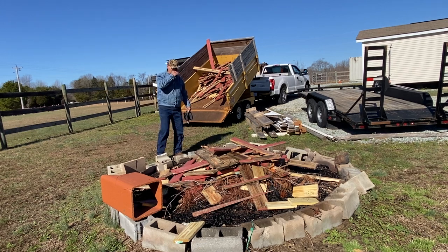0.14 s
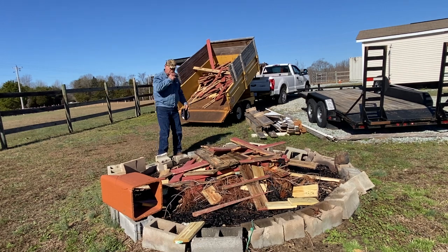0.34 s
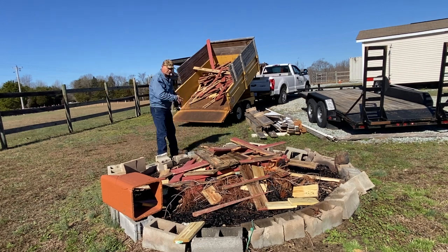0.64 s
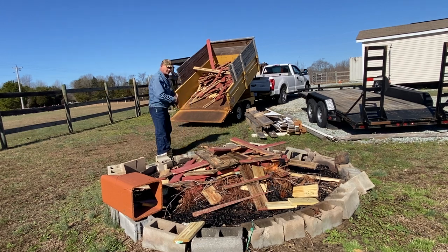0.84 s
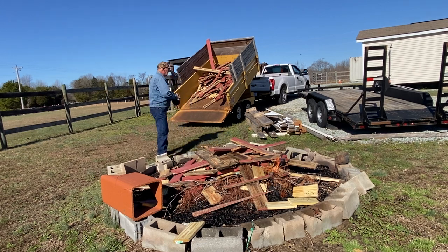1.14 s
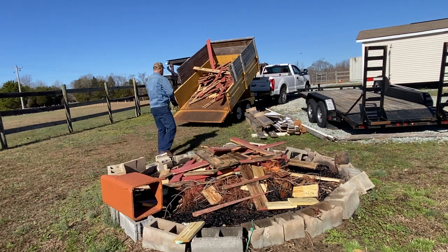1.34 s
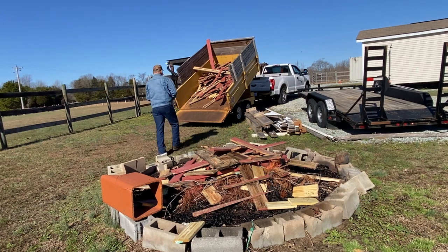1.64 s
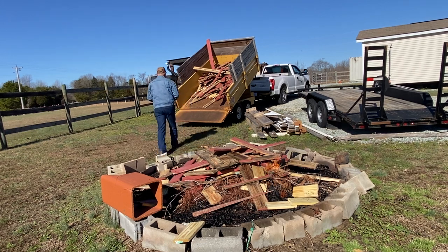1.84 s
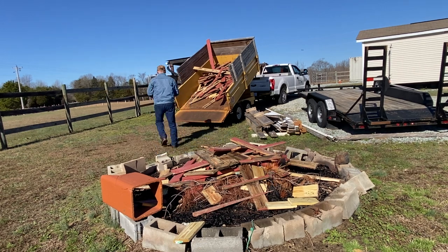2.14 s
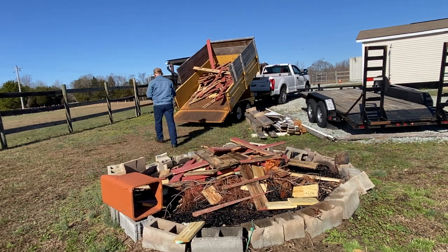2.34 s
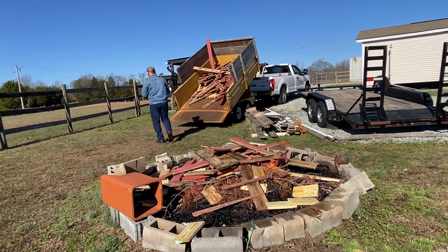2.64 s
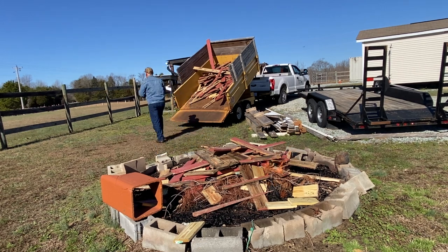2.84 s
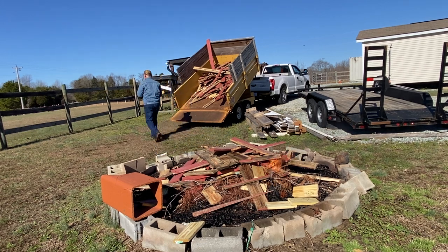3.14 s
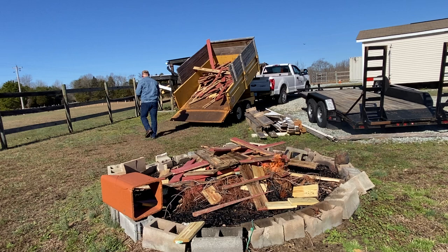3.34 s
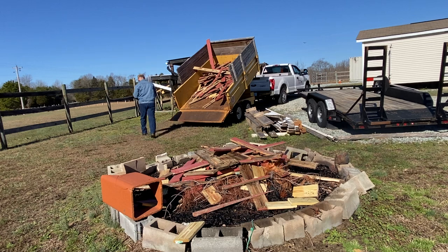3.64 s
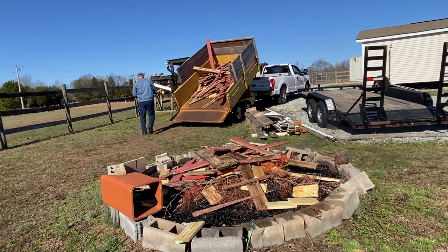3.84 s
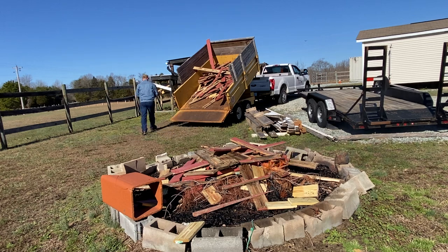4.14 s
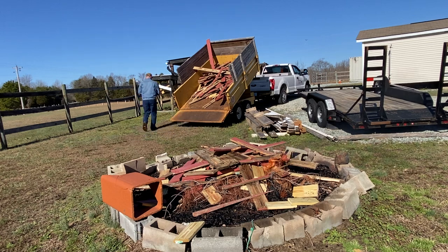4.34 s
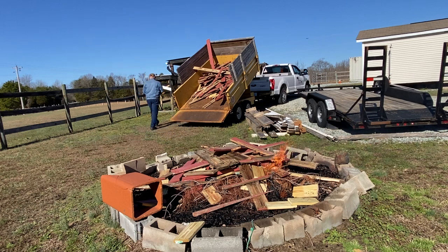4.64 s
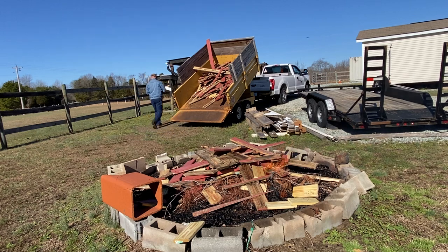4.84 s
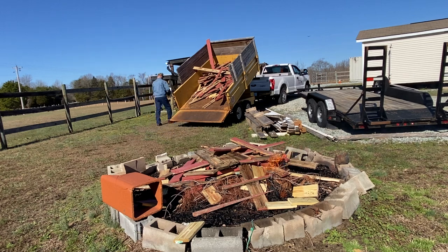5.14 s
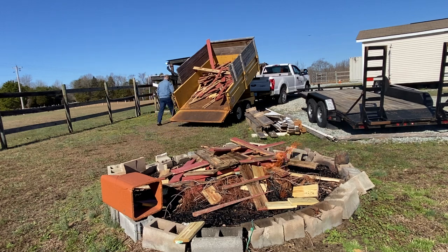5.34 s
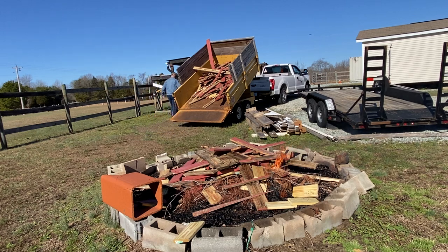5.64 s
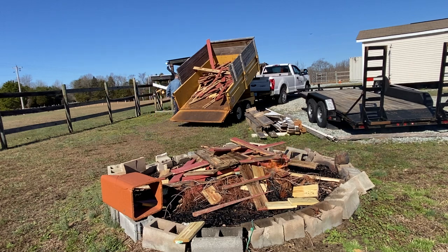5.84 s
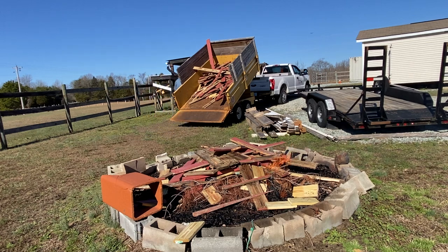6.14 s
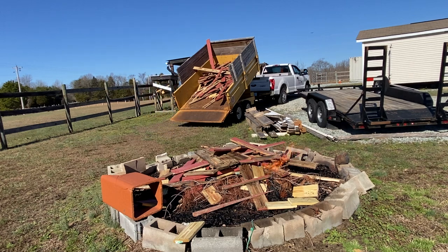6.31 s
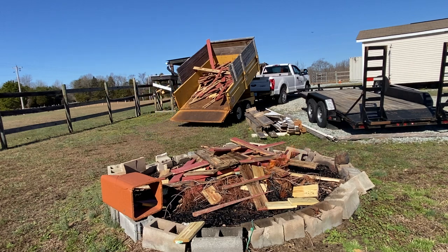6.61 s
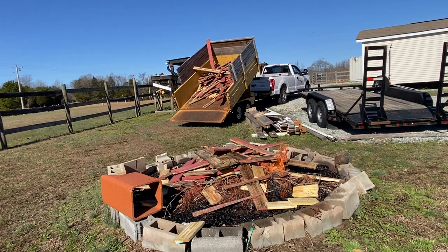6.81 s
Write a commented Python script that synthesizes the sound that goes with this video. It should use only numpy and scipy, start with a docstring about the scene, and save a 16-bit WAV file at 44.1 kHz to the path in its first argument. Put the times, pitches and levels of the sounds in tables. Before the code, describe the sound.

Sharp pops and spitting sap from a young wood fire outdoors, over buffeting breeze, a low distant idle and a hollow roar that swells and fades.

```python
"""Uneven wind rumble and a far rush, both shaped noise, are heard first.
Sharp pops and small ticks of burning scrap wood stand out, with spurts of sizzling sap:
cracks, wood rings and scattered noise make the snaps, shaped hiss the sizzle and the soft flames.
After one longer, duller swish, someone steps on dry grass; an engine, summed sine waves, idles further away.
A hollow roar of noise swells and dies away, and thin tones arch like bird calls."""
import sys
import numpy as np
from scipy import signal
from scipy.fft import rfft, irfft, next_fast_len
from scipy.io import wavfile

SR = 44100
rng = np.random.default_rng(int(sys.argv[2]) if len(sys.argv) > 2 else 0)


def transcribe(signal):
    """Save signal, clipped to [-1, 1], as a 16-bit WAV file at the path in sys.argv[1]."""
    frames = np.atleast_2d(signal).T
    limited = np.clip(frames, -1, 1)
    pcm = np.round(limited * 32767).astype(np.int16)
    wavfile.write(sys.argv[1], SR, pcm)


N = 307465
TIME = np.arange(N) / SR


def from_db(db):
    """Turns decibels into a factor of amplitude."""
    return 10 ** (np.asarray(db) / 20)


def rms_one(x):
    """Scales a signal to an average strength (rms) of 1."""
    return x / np.sqrt(np.mean(x ** 2) + 1e-20)


def in_time(rows):
    """Draws straight lines between the rows: one value per sample for each column after the time."""
    seconds, *columns = np.transpose(rows)
    return [np.interp(TIME, seconds, column) for column in columns]


def at_hz(points, hz):
    """Reads a curve over frequency, on a logarithmic frequency axis."""
    points = np.array(points)
    return np.interp(np.log(hz + 1e-9), np.log(points[:, 0]), points[:, 1])


def bin_hz(size):
    """Frequencies of the bins of a spectrum."""
    return np.arange(size // 2 + 1) * SR / size


def band(x, low_hz, high_hz, order=2):
    """Keeps the sound between two frequencies."""
    sos = signal.butter(order, [low_hz, min(high_hz, .45 * SR)], "band", fs=SR, output="sos")
    return signal.sosfilt(sos, x + 1e-18)


def drift(rate_hz):
    """Slow random wandering with spread 1: noise smoothed by two equal low-passes."""
    step = 40  # samples between two slow values
    r = np.exp(-2 * np.pi * step * rate_hz / SR)
    noise = rng.standard_normal(N // step + 2002)
    slow = signal.lfilter([1], [1, -2 * r, r * r], noise)[2000:]  # skips the filter's start
    return np.interp(np.arange(N) / step, np.arange(len(slow)), rms_one(slow))


def swells(rows):
    """Smooth bell-shaped rises and falls of amplitude, added in power."""
    power = 0
    for middle_s, length_s, db in rows:
        distance = np.abs(2 * (TIME - middle_s) / length_s)
        power = power + from_db(2 * db) * np.exp(-np.minimum(distance ** 2, 60))
    return np.sqrt(power)


def noise_pair(colour, alike, phase=None):
    """Coloured stereo noise of rms 1; the share "alike" of its power is common to both ports."""
    size = next_fast_len(N)
    hz = bin_hz(size)
    alike = np.clip(alike, 0, 1)
    shared, *own = rfft(rng.standard_normal((3, size)))
    pair = np.sqrt(alike) * shared + np.sqrt(1 - alike) * np.array(own)
    if phase is not None:
        pair[1] *= np.exp(-1j * at_hz(phase, hz))
    # fade out beyond both ends of the colour
    top_edge = 1 / (1 + (hz / (1.5 * colour[-1][0])) ** 6)
    bottom_edge = 1 / (1 + (colour[0][0] / (1.5 * hz + 1)) ** 4)
    shaped = pair * top_edge * bottom_edge * from_db(at_hz(colour, hz))
    return rms_one(irfft(shaped, size)[:, :N])


def place_in_stereo(x, lag_s, left_db):
    """Delays the left port (a negative lag makes it lead) and sets its level against the right one."""
    left, right = np.broadcast_to(x, (2, N))
    size = next_fast_len(N)
    delay = np.exp(-2j * np.pi * bin_hz(size) * lag_s)
    late = irfft(rfft(left, size) * delay, size)[:N]
    return np.array([late * from_db(left_db / 2), right * from_db(-left_db / 2)])


def patchy(x, low_hz, high_hz, patchy_db, count=14):
    """Each narrow band of a far sound swells and fades by itself in the moving air."""
    size = next_fast_len(N)
    spectrum = rfft(x, size)
    place = (count - 1) * at_hz([(low_hz, 0), (high_hz, 1)], bin_hz(size))
    out = 0
    for k in range(count):
        slice_gain = np.maximum(1 - np.abs(place - k), 0)  # overlapping triangles
        narrow = irfft(spectrum * slice_gain, size)[:, :N]
        out = out + from_db(patchy_db * drift(6.5)) * narrow
    return rms_one(out)


# thin, far tones like bird calls: (middle [s], length [s], top pitch [Hz], level [dB])
FAR_TONES = [(.21, .1, 1720, -80), (.3, .3, 1370, -78), (1.36, .36, 2720, -80)]


def far_tones(sag=.035, waver=0.0075):
    """Faint sine tones swell and fade; the pitch of each arches once and wavers a little."""
    out = 0
    for middle_s, length_s, top_hz, db in FAR_TONES:
        arch = sag * np.minimum((2 * (TIME - middle_s) / length_s) ** 2, 2)
        hz = top_hz * (1 - arch + waver * drift(16))
        tone = np.sqrt(2) * np.sin(2 * np.pi * np.cumsum(hz) / SR)
        out = out + tone * swells([(middle_s, length_s, db)])
    return place_in_stereo(out, lag_s=-.00015, left_db=0)


# how far the left port leads in far sounds, roar and rush: (frequency [Hz], lead [radians])
FAR_PHASE = [(250, 1.2), (500, 2.06), (900, 2.65), (1400, 3.81), (2200, 4.6), (4000, 4.35)]
# tone colour of the hollow roar: (frequency [Hz], relative level per Hz [dB])
ROAR_COLOUR = [(430, -15), (560, 1), (690, 0), (820, -10.5), (1100, -14.5)]
# the roar swells and dies away: (time [s], level [dB])
ROAR = [(3.7, -85), (4.05, -63), (4.45, -59.5), (4.7, -54.5), (4.95, -58), (5.55, -57.5), (6.15, -66),
        (6.5, -63.5), (6.97, -68)]
# its pitch dips and rises again: (time [s], pitch [ratio])
ROAR_PITCH = [(4.7, 1.04), (5.1, 0.99), (6.2, 1.06)]


def roar(waver_db=0.7):
    """A hollow roar of churning noise; reading it faster or slower bends its pitch."""
    level_db, = in_time(ROAR)
    ratio, = in_time(ROAR_PITCH)
    far_noise = noise_pair(ROAR_COLOUR, alike=0.96, phase=FAR_PHASE)
    churn = patchy(far_noise, 500, 850, patchy_db=2, count=6)
    read_at = np.cumsum(ratio) % N
    gliding = np.array([np.interp(read_at, np.arange(N), side) for side in churn])
    return from_db(level_db + waver_db * drift(6.0)) * gliding


# loudness of the engine: (time [s], level [dB])
ENGINE = [(0, -60.5), (1.1, -47.5), (2, -45), (2.5, -44.5), (3, -39.5), (4.3, -41.5), (5.3, -40.5),
          (6.2, -43), (6.5, -49.5), (6.97, -46)]
# idling speed of the engine: (time [s], speed [cycles per s])
IDLE = [(0, 11.45), (3.6, 11.55), (4.7, 11.45), (6.1, 11.2)]
# the exhaust note: (multiple of the cycle rate, relative level [dB])
ORDERS = [(5, 1), (8, -1), (11, -1.5), (13, 1), (14, -8.5), (16, -4.5), (19, -17.5)]


def engine(bass_growth=0.57, hunt=.004, waver_db=1.6):
    """Uneven firing favours a few multiples of the cycle rate; moving air makes each one waver."""
    level_db, = in_time(ENGINE)
    idle_hz, = in_time(IDLE)
    speed_hz = idle_hz * (1 + hunt * drift(2.01))
    turn = 2 * np.pi * np.cumsum(speed_hz) / SR
    # the deepest multiples fade first when the engine is faint
    bass_db = bass_growth * np.minimum(level_db - np.median(level_db), 0)
    note = 0
    for multiple, db in ORDERS:
        strength = from_db(db + (multiple < 10) * bass_db + waver_db * drift(2.2))
        note = note + strength * np.sin(round(multiple) * turn + rng.uniform(0, 2 * np.pi))
    return place_in_stereo(from_db(level_db) * rms_one(note), lag_s=-0.00032, left_db=-1.5)


# the breeze between gusts: (time [s], buffeting level [dB], low rumble level [dB])
WIND = [(0, -55.5, -48.5), (1.1, -50.5, -47), (1.8, -44.5, -48.5), (2.15, -46, -50), (2.55, -52, -45.5),
        (3.3, -49, -46.5), (4.2, -44, -45.5), (5.05, -46.5, -43), (5.6, -45.5, -48.5), (5.9, -47.5, -51.5),
        (6.25, -52, -55), (6.52, -51, -52), (6.97, -48, -56.5)]
# gusts that hit the ports: (middle [s], length [s], buffeting level [dB], low rumble level [dB])
GUSTS = [(0.19, 0.15, -46, -49), (2.173, 0.4, -55, -44), (2.932, 0.28, -46, -68), (4.053, 0.26, -41.5, -64),
         (5.435, 0.063, -38, -56), (5.678, 0.11, -41.5, -55), (6.15, 0.33, -40, -50),
         (6.74, 0.098, -36.5, -52), (6.887, 0.075, -47, -48.5)]
# far rush of the open land, which also guides the flames: (time [s], level [dB])
RUSH = [(0, -62), (.25, -59.5), (.6, -59.5), (.9, -59), (1.1, -60), (1.25, -55), (1.45, -58), (2.6, -59.5),
        (5.1, -60), (5.8, -59), (6.97, -61)]
# tone colours of buffeting, low rumble, small eddies and far rush:
# each (frequency [Hz], relative level per Hz [dB])
BUFFET_COLOUR = [(20, -23.5), (32, -13.5), (48, 1), (65, 5), (100, 4.5), (140, -7), (200, -33), (300, -45)]
RUMBLE_COLOUR = [(70, -19.5), (120, 0.5), (175, 2), (230, -8.5), (280, -17), (380, -39)]
EDDY_COLOUR = [(190, -1), (250, 0.5), (320, -10), (420, -15.5), (650, -44)]
RUSH_COLOUR = [(350, -13.5), (480, -2.5), (780, 3), (1050, 0), (1400, -8), (2000, -21.5), (3500, -31.5),
               (8000, -40.5)]


def wind(lumps_db=1.5, flutter_db=1.5, eddy_growth=0.55):
    """Gusts buffet the microphone ports over a low rumble and the rush of the open land."""
    breeze_db, rumble_db = in_time(WIND)
    rush_db, = in_time(RUSH)
    gust_force = swells([(s, length, buffet_db) for s, length, buffet_db, _ in GUSTS])
    gust_surge = swells([(s, length, low_db) for s, length, _, low_db in GUSTS])
    force = np.hypot(from_db(breeze_db), gust_force)
    surge = np.hypot(from_db(rumble_db), gust_surge)
    buffet = force * from_db(lumps_db * drift(5.8)) * noise_pair(BUFFET_COLOUR, alike=0.41)
    # small eddies grow faster than the rumble, so a stronger breeze is brighter
    eddy_db = -8.5 + eddy_growth * (rumble_db - np.mean(rumble_db))
    eddies = from_db(eddy_db) * noise_pair(EDDY_COLOUR, alike=0.8)
    churn = noise_pair(RUMBLE_COLOUR, alike=0.98) + eddies
    placed = place_in_stereo(churn, lag_s=-0.00035, left_db=-3.0)
    rumble = surge * from_db(flutter_db * drift(15.7)) * placed
    land = noise_pair(RUSH_COLOUR, alike=0.77, phase=FAR_PHASE)
    rush = from_db(rush_db) * patchy(land, 350, 1900, patchy_db=2)
    return buffet + rumble + rush


# footsteps in dry grass, after one longer, duller swish:
# (middle [s], length [s], level [dB], centre frequency [Hz])
SWISH_AND_STEPS = [(1.248, 0.23, -64, 1000), (1.922, 0.1, -68, 2000), (2.508, 0.091, -65, 2110),
                   (3.118, 0.073, -64, 1980), (3.618, 0.075, -69, 2000)]
# tone colour of the swish and of crushed grass: (frequency [Hz], relative level per Hz [dB])
GRASS_COLOUR = [(600, -3.5), (3000, -7), (8000, -7)]


def swish_and_footsteps(crunch_db=4.5):
    """A dull swish, then footsteps crushing dry grass: grainy noise, each in a band of its own."""
    crunch = rms_one(from_db(crunch_db * drift(130)))
    grass = crunch * place_in_stereo(noise_pair(GRASS_COLOUR, alike=.8), lag_s=-.0001, left_db=2)
    out = 0
    for middle_s, length_s, db, hz in SWISH_AND_STEPS:
        rustle = rms_one(band(grass, hz / 1.67, hz * 1.13, order=1))
        out = out + swells([(middle_s, length_s, db)]) * rustle
    return out


# tone colour of the flames: (frequency [Hz], relative level per Hz [dB])
FLAME_COLOUR = [(900, 5.5), (1500, -1.5), (2300, -0.5), (3100, -7.5), (5000, -11.5), (7000, -16),
                (9000, -23), (16000, -24)]
FLAME_DB = -75.5  # level at mean vigour and mean rush
FLAME_FOLLOWS, FLAME_FANNED = 0.47, 0.96  # shares of the swings in vigour and in the far rush


def flames(vigour_db, flutter_db=3.0):
    """The soft fluttering rustle of burning kindling grows with the fire, and the breeze fans it."""
    rush_db, = in_time(RUSH)
    grown_db = FLAME_FOLLOWS * (vigour_db - np.mean(vigour_db))
    fanned_db = FLAME_FANNED * (rush_db - np.mean(rush_db))
    rustle = place_in_stereo(noise_pair(FLAME_COLOUR, alike=.5), lag_s=0, left_db=3.5)
    return from_db(FLAME_DB + grown_db + fanned_db + flutter_db * drift(29)) * rustle


# jets of steam from boiling sap: (middle [s], length [s], level [dB])
SPURTS = [(.97, 0.3, -78), (1.785, 0.093, -66.5), (2.371, 0.047, -64), (2.55, .3, -75),
          (2.952, 0.041, -67.5), (3.25, 0.037, -60.5), (3.57, 0.085, -62.5), (4.105, 0.084, -60.5),
          (4.34, 0.041, -70.5), (5.23, 0.039, -72)]
# tone colour of the steam: (frequency [Hz], relative level per Hz [dB])
SIZZLE_COLOUR = [(2500, -13.5), (5000, -8.5), (8300, -11.5), (10500, -8), (13000, -0.5), (16000, -0.5)]
# the fire lies to the right, so the left port hears its hiss and cracks later
PORT_LAG_S = .000266


def sizzle(vigour_db, grain_db=2.0, unsteady_db=4.0):
    """Steam spits from the wood as a bright, grainy hiss that comes in spurts."""
    steady = from_db(vigour_db + unsteady_db * drift(28))
    flow = np.hypot(steady, swells(SPURTS))
    spit = rms_one(from_db(grain_db * drift(100)))
    hiss = place_in_stereo(noise_pair(SIZZLE_COLOUR, alike=.98), PORT_LAG_S, left_db=0)
    return flow * spit * hiss


def fractures(count, tear_s=.00016, fibres=0.29, size=256):
    """Each fracture is a step of pressure plus a split second of tearing fibres."""
    fade = np.exp(-np.arange(size) / (tear_s * SR))
    bursts = fibres * rng.standard_normal((count, size)) * fade
    bursts[:, 0] += 2
    return band(bursts, 9500, 16000)


# what a splitting board rings with:
# (multiple of the ring pitch, relative level [dB], time to fade by 60 dB [cycles])
WOOD_MODES = [(.3, -4.5, 3.3), (.64, 0.5, 5.2), (1.05, 2.5, 8.8), (1.35, -13, 9.2)]


def wood_rings(ring_hz, uneven_db=2, size=256):
    """Each board rings for a few cycles at its own pitch, with its own mix of modes."""
    turns = np.outer(ring_hz, np.arange(size) / SR)
    out = 0
    for k, (multiple, db, cycles) in enumerate(WOOD_MODES):
        strength_db = db + uneven_db * rng.standard_normal((len(ring_hz), 1))
        fading = from_db(strength_db - 60 * multiple * turns / cycles)
        out = out + (-1) ** k * fading * np.cos(2 * np.pi * multiple * turns)
    return band(out, 850, 7500)


def snaps(times, levels_db, bursts):
    """Sets each burst at its moment, with its level counted over 2 ms."""
    size = bursts.shape[1]
    energy = np.sum(bursts ** 2, axis=1, keepdims=True)
    bursts = bursts * np.sqrt(.002 * SR / energy)
    out = np.zeros(N + size)
    for s, db, burst in zip(times, levels_db, bursts):
        at = int(np.clip(s * SR, 0, N - 1))
        out[at:at + size] += from_db(db) * burst
    return out[:N]


def scatter(x, wet_db, t60_s, low_hz, high_hz):
    """Countless small reflections: each snap's energy dies away as noise, different at each port."""
    keep = from_db(-120 / (t60_s * SR))  # energy kept per sample: 60 dB down after t60_s
    energy = signal.lfilter([0, 1 - keep], [1, -keep], x ** 2 + 1e-18)
    noise = rms_one(band(rng.standard_normal((2, N)), low_hz, high_hz))
    return from_db(wet_db) * np.sqrt(energy) * noise


# pops and snaps of the wood, levels over the first 2 ms:
# (time [s], bright crack level [dB], woody body level [dB], ring pitch [Hz])
POPS = [(0.3251, -61.5, -65, 5600), (0.3427, -69, -64, 6700), (0.3799, -59.5, -69, 5700),
        (0.5199, -57, -59.5, 4500), (0.6951, -44, -48.5, 5640), (0.7033, -62, -59, 4800),
        (1.1153, -46.5, -53.5, 4300), (1.2376, -59, -64, 5300), (1.3475, -54, -58, 4900),
        (1.5176, -62.5, -64.5, 3560), (1.5439, -63, -66, 5200), (1.583, -64, -69, 5100),
        (1.6594, -57, -59, 4500), (1.9386, -40, -49, 5670), (2.0301, -65, -64, 5400),
        (2.0555, -53.5, -53.5, 5950), (2.1338, -63, -77, 5500), (2.4034, -55, -54, 5200),
        (2.6697, -58, -62.5, 3700), (2.7786, -63, -73, 5300), (2.813, -52, -55.5, 5740),
        (2.9988, -64, -59.5, 4520), (3.0346, -56.5, -55, 4640), (3.0619, -46, -43.5, 4900),
        (3.1492, -53, -51.5, 3440), (3.2273, -48.5, -51.5, 5330), (3.2771, -56, -54.5, 4430),
        (3.34, -56, -57.5, 6050), (3.4113, -63, -54.5, 5030), (3.4284, -65, -60, 5230),
        (3.4632, -63, -49, 4400), (3.4699, -50.5, -54, 5230), (3.4742, -52, -53, 4050),
        (3.5814, -54.5, -63, 5900), (3.6145, -54.5, -58, 4900), (3.622, -62, -58, 3540),
        (4.0079, -50, -46.5, 4550), (4.0281, -62.5, -62, 5900), (4.0466, -60, -55.5, 5343),
        (4.293, -62, -63, 4400), (4.7125, -62, -72, 4700), (4.7592, -52.5, -53.5, 4800),
        (4.866, -53.5, -66, 6530), (4.9184, -60.5, -62, 5600), (4.992, -63, -57, 3450),
        (5.017, -61, -62.5, 4800), (5.0959, -65, -63, 4800), (5.1853, -66, -60, 2580),
        (5.2816, -39.5, -43.5, 5800), (5.3434, -57, -65.5, 6000), (5.5301, -64, -68, 5790),
        (5.8041, -53, -51, 4000), (6.1221, -58, -59.5, 4850), (6.3626, -65, -67.5, 4100),
        (6.6019, -57.5, -54, 4370), (6.6256, -63.5, -63.5, 4825)]
# small ticks: their sizes spread upwards from TICK_DB (at mean vigour) and stay under TICK_TOP_DB
TICKS_PER_S, TICK_DB, TICK_SPREAD_DB, TICK_TOP_DB = 32, -80, 5, -64.5  # rate before flurries
TICK_RATE_FOLLOWS, TICK_LEVEL_FOLLOWS = 0.55, 0.67  # shares of the swing in vigour
BODY_LAG_S = .00005  # the left port hears the woody body this much later


def crackle(vigour_db, flurry_db=4.0):
    """Loud pops and random flurries of small ticks; the ticks grow denser and louder with the fire."""
    swing_db = vigour_db - np.mean(vigour_db)
    rate = TICKS_PER_S * from_db(TICK_RATE_FOLLOWS * swing_db + flurry_db * drift(6))
    at = np.flatnonzero(rng.random(N) < rate / SR)
    size, woodiness, pitch = rng.random((len(at), 3)).T
    spread_db = -TICK_SPREAD_DB * np.log(1 - size)  # many small ticks, few big ones
    small_db = np.minimum(TICK_DB + TICK_LEVEL_FOLLOWS * swing_db[at] + spread_db, TICK_TOP_DB)
    ticks = np.column_stack([TIME[at], small_db, small_db - 12 * woodiness, 3600 * 2 ** pitch])
    seconds, crack_db, body_db, ring_hz = np.vstack([POPS, ticks]).T
    crack = snaps(seconds, crack_db, fractures(len(seconds)))
    body = snaps(seconds, body_db, wood_rings(ring_hz))
    direct = place_in_stereo(crack, PORT_LAG_S, left_db=0)
    direct += place_in_stereo(body, BODY_LAG_S, left_db=3.5)
    # the pile of boards scatters each snap for an instant, the yard a little longer
    pile = scatter(crack, wet_db=-14, t60_s=.016, low_hz=9500, high_hz=16000)
    pile += scatter(body, wet_db=-11, t60_s=.014, low_hz=1500, high_hz=7500)
    yard = scatter(body, wet_db=-9.5, t60_s=0.11, low_hz=1780, high_hz=7360)
    return direct + pile + yard


# vigour of the fire, as the level of its steady sizzle: (time [s], level [dB])
VIGOUR = [(0, -87), (1.5, -88), (3.2, -75), (4.5, -81), (5.3, -81.5), (5.6, -87), (6.97, -89.5)]


def scene():
    """Adds the far sounds, the wind, the swish and footsteps, and the fire, whose parts share one vigour."""
    vigour_db, = in_time(VIGOUR)
    background = far_tones() + roar() + engine() + wind()
    fire = flames(vigour_db) + sizzle(vigour_db) + crackle(vigour_db)
    return background + swish_and_footsteps() + fire


# resonances and dips of the microphone ports: (frequency [Hz], width [Hz], level [dB])
PORT_COLOUR = [(4170, 1260, 1), (8410, 2080, -8.5), (9930, 2360, 8.5), (16200, 1900, -3.5)]
CUTOFF_HZ = 16500


def record(dry):
    """The small ports colour the treble; the top is cut steeply."""
    for hz, width_hz, db in PORT_COLOUR:
        b, a = signal.iirpeak(hz, hz / width_hz, fs=SR)
        dry = dry + (from_db(db) - 1) * signal.lfilter(b, a, dry)
    steep = signal.ellip(10, .3, 80, CUTOFF_HZ, fs=SR, output="sos")
    return signal.sosfilt(steep, dry)


dry = scene()
out = record(dry)
transcribe(out)
```